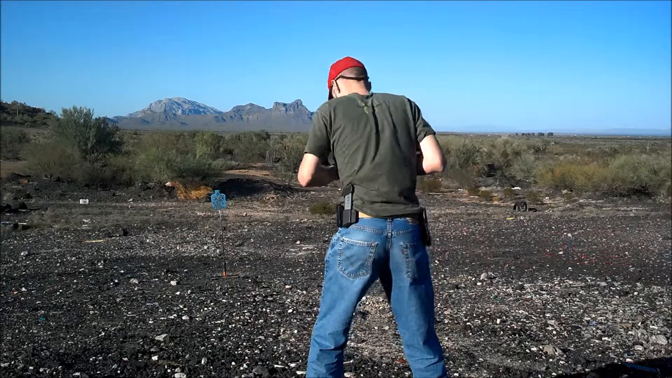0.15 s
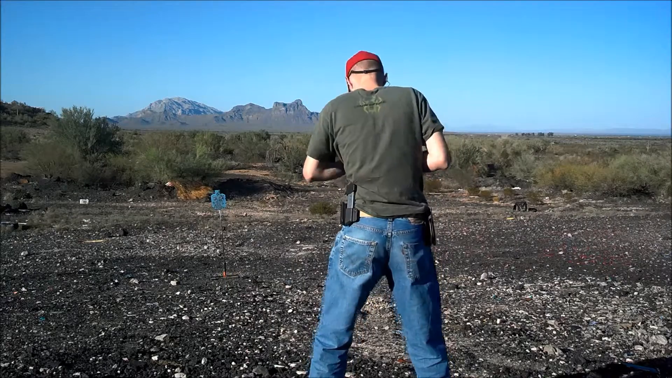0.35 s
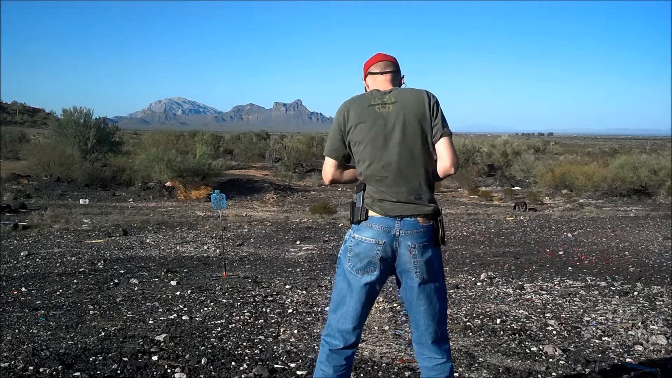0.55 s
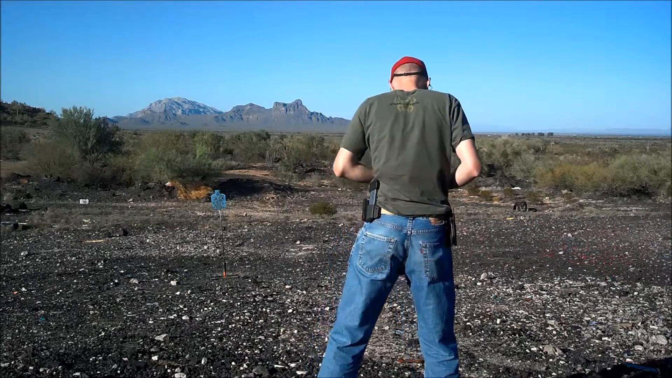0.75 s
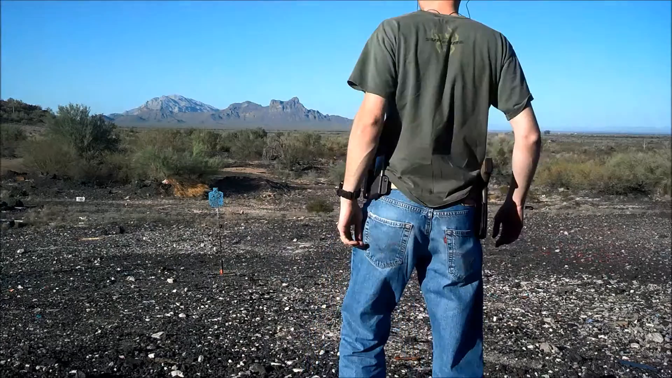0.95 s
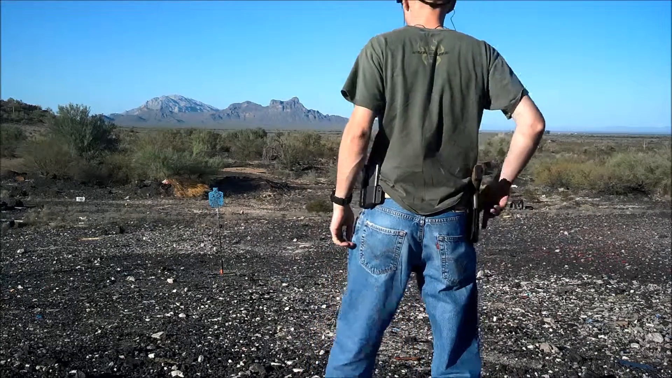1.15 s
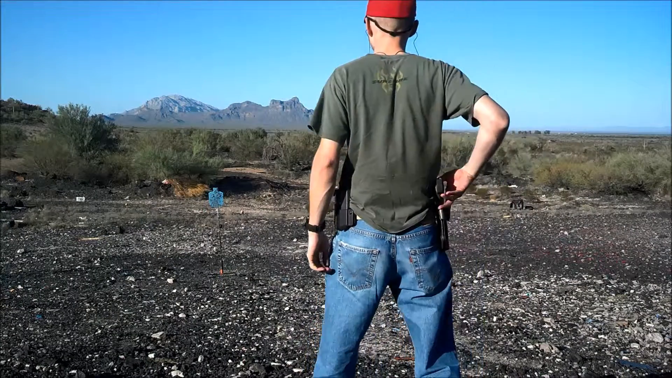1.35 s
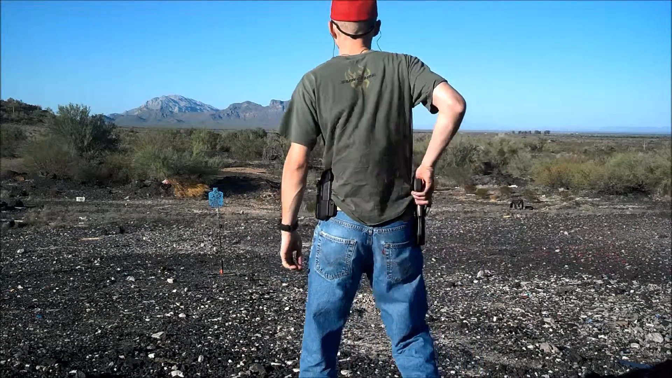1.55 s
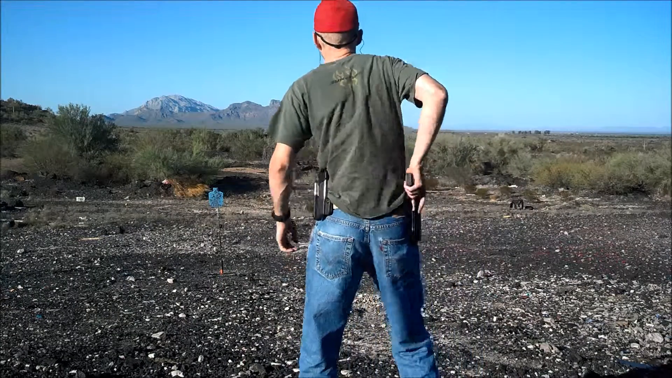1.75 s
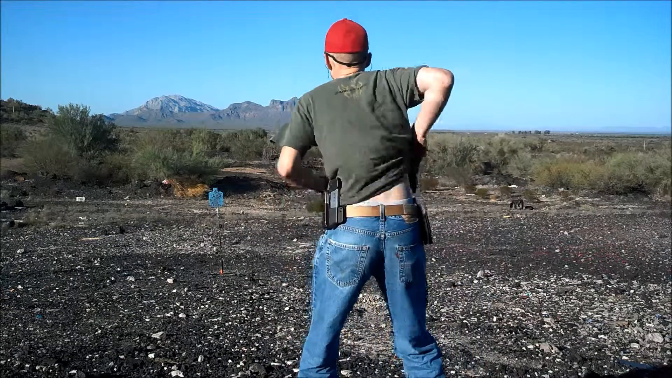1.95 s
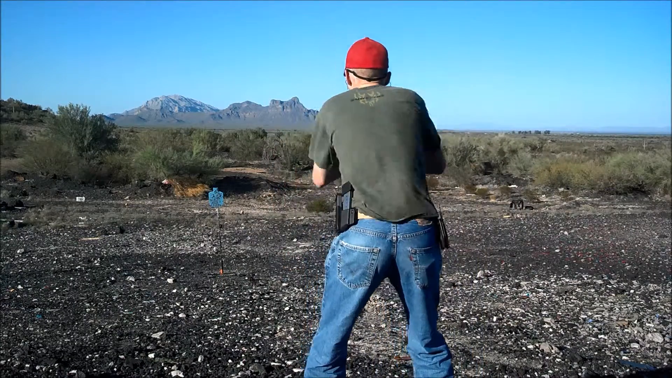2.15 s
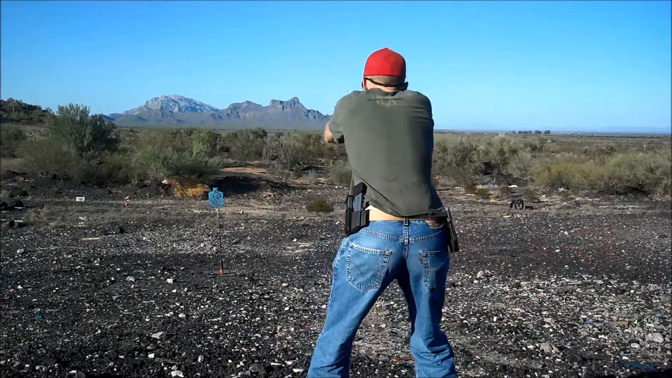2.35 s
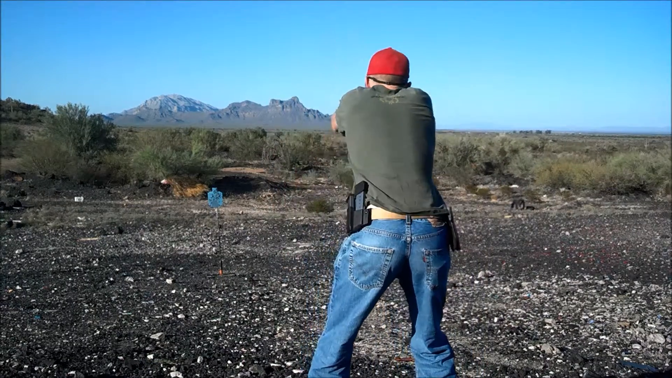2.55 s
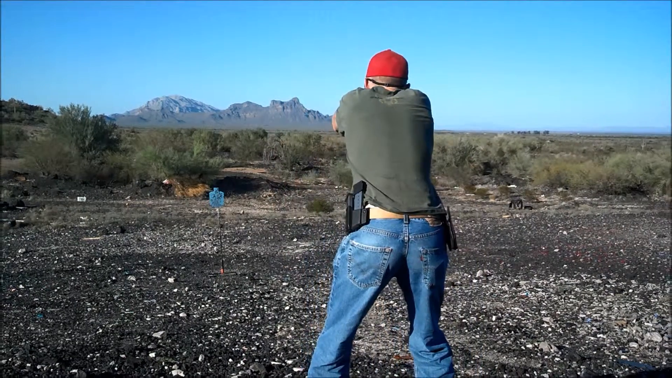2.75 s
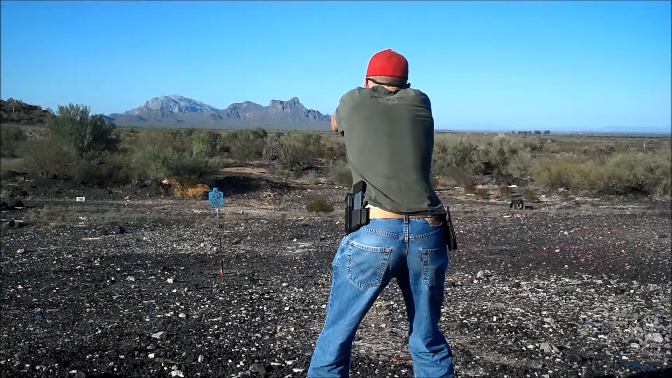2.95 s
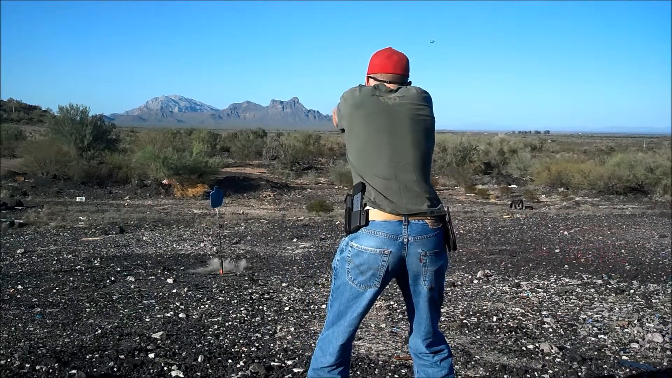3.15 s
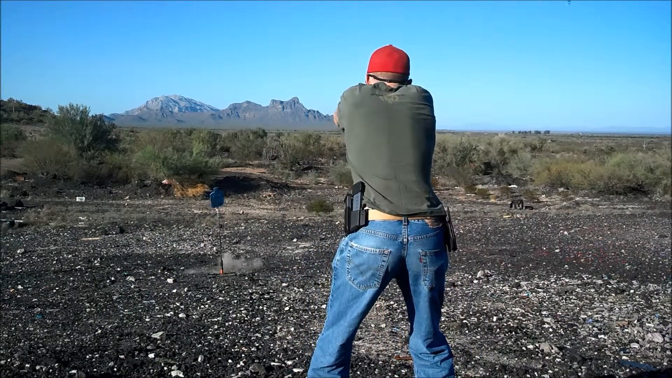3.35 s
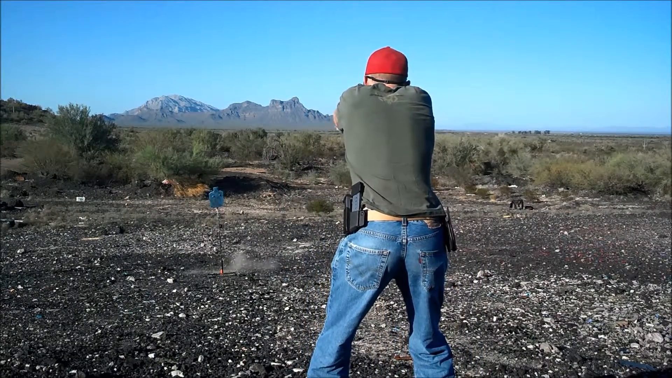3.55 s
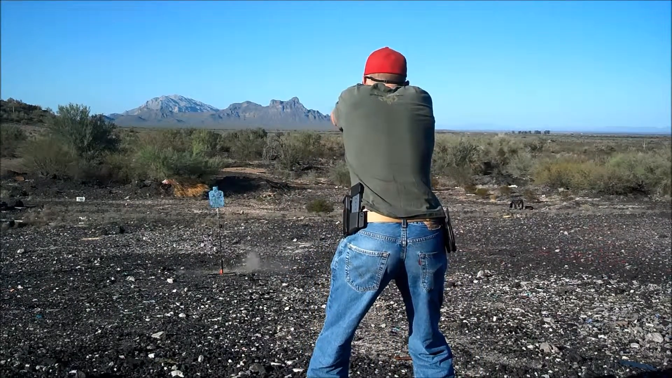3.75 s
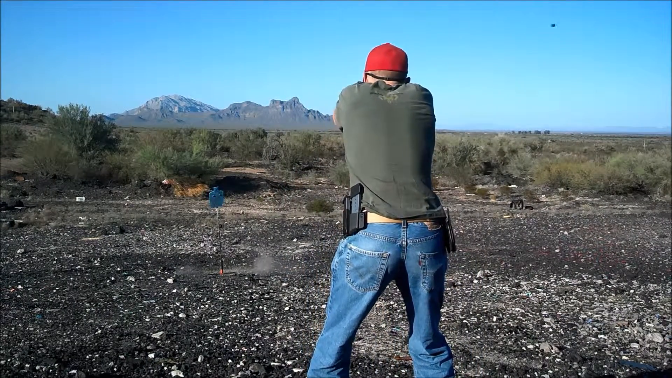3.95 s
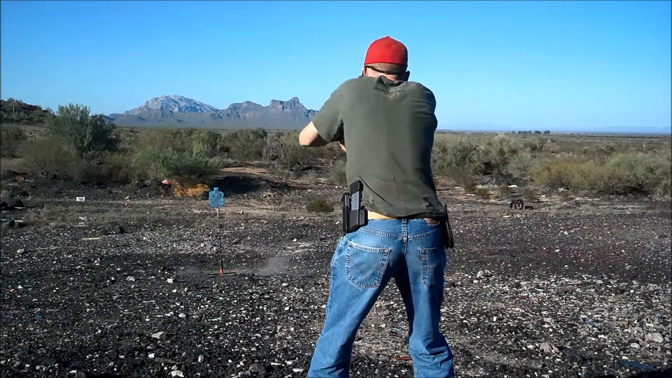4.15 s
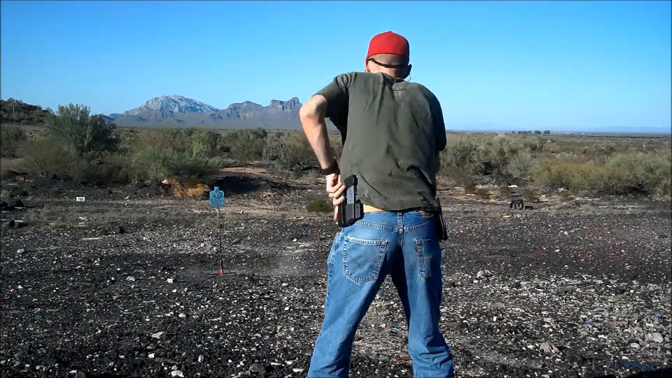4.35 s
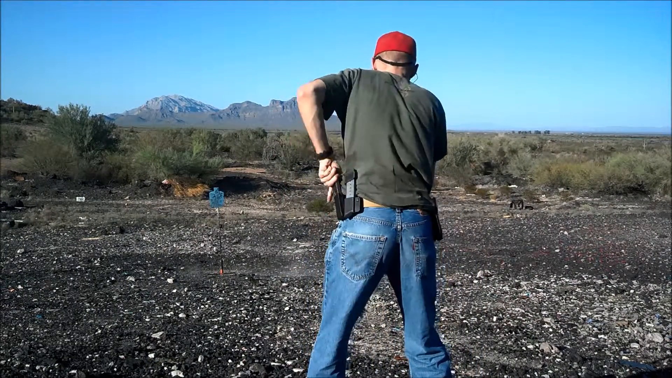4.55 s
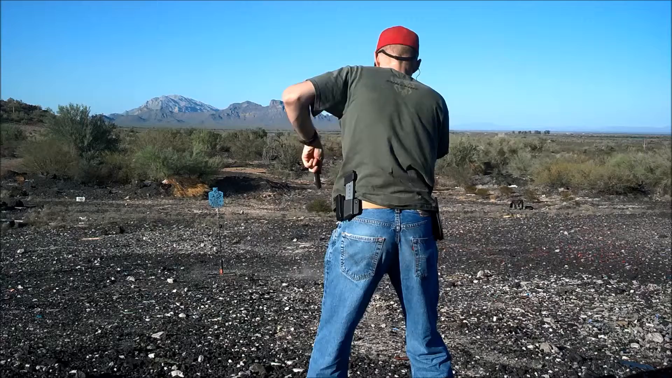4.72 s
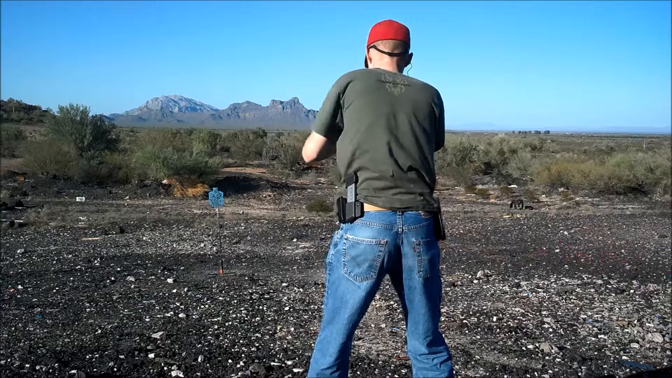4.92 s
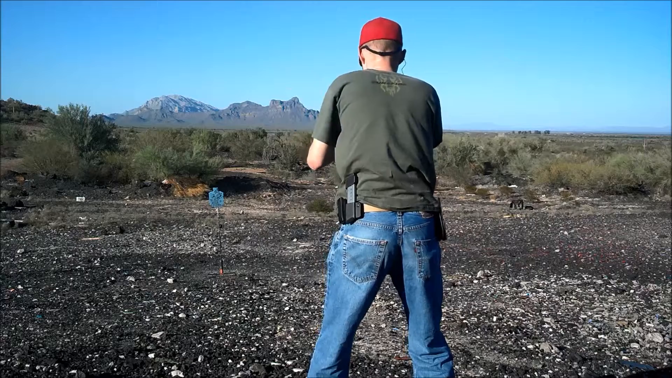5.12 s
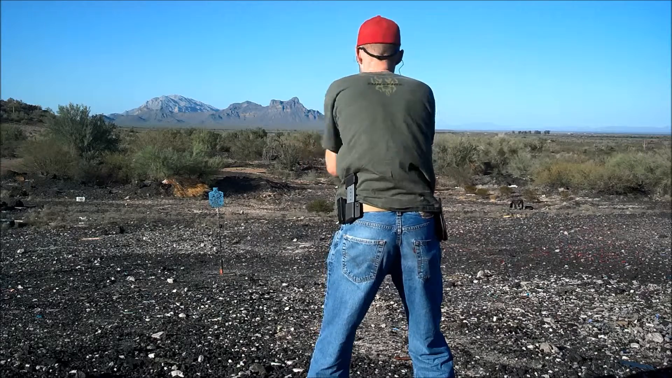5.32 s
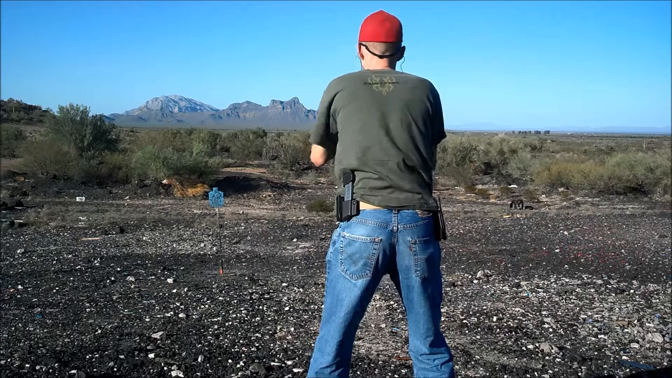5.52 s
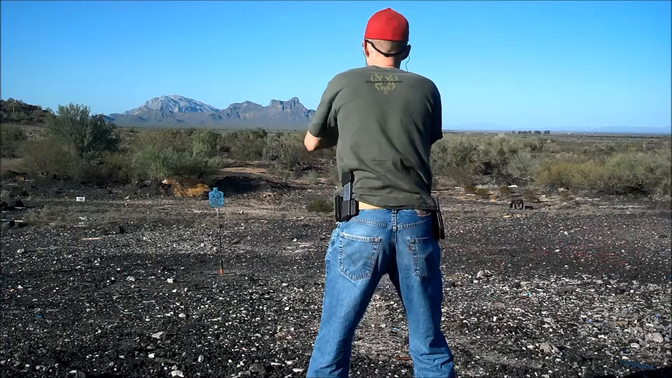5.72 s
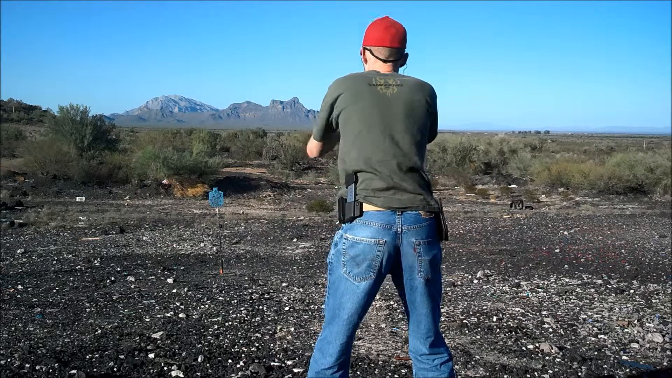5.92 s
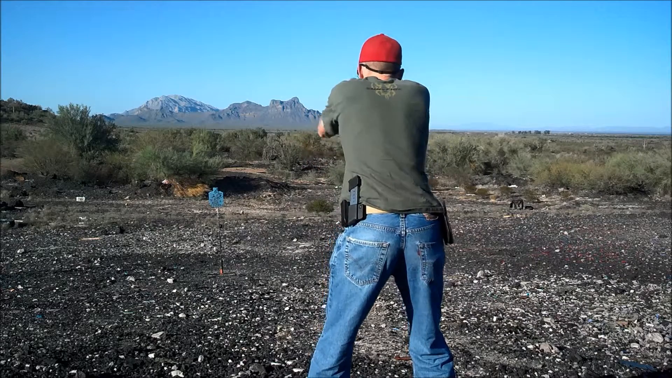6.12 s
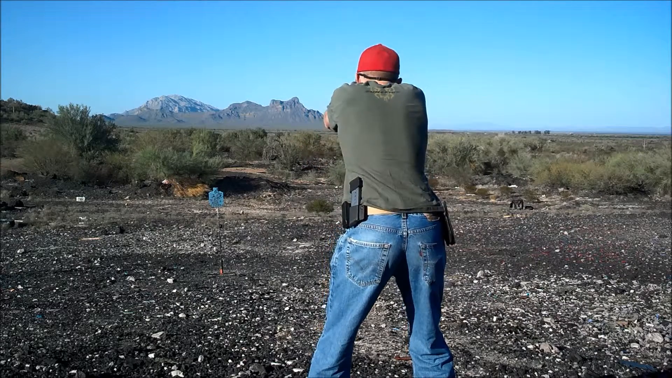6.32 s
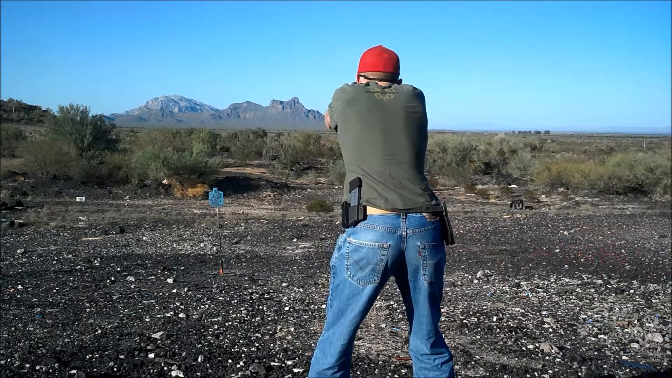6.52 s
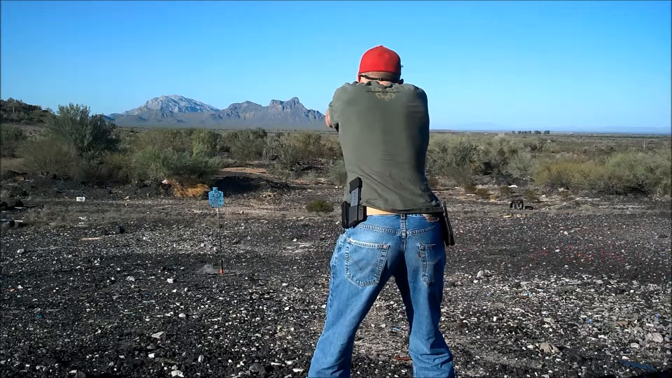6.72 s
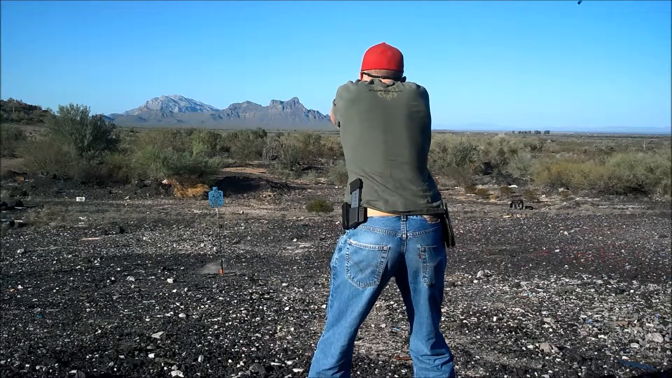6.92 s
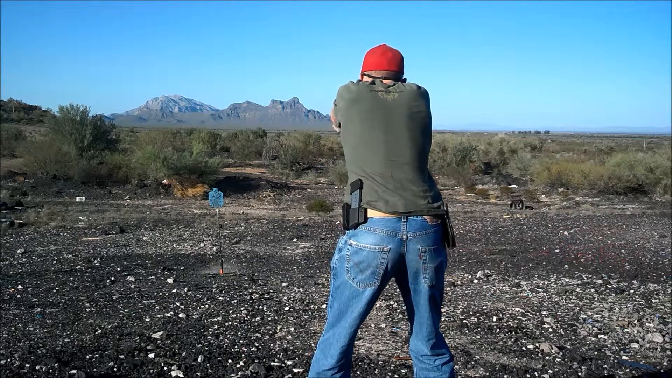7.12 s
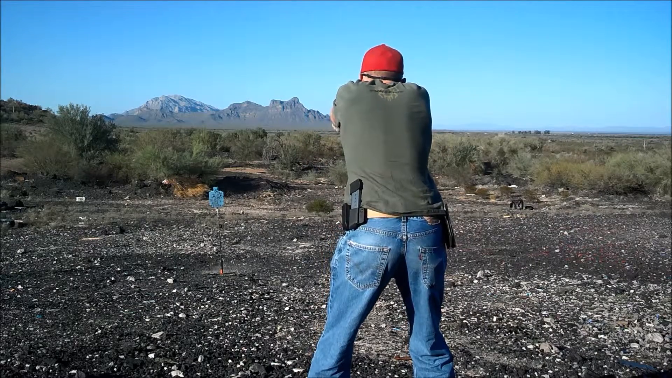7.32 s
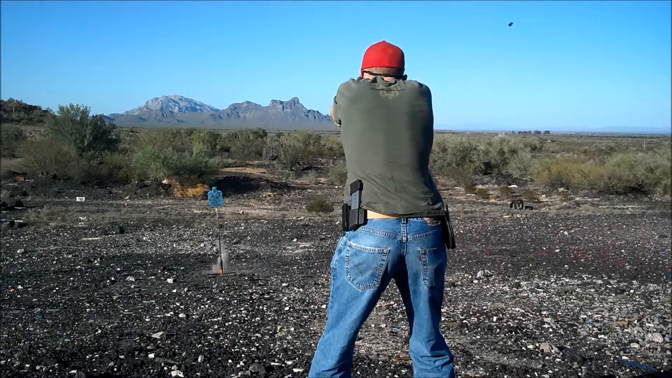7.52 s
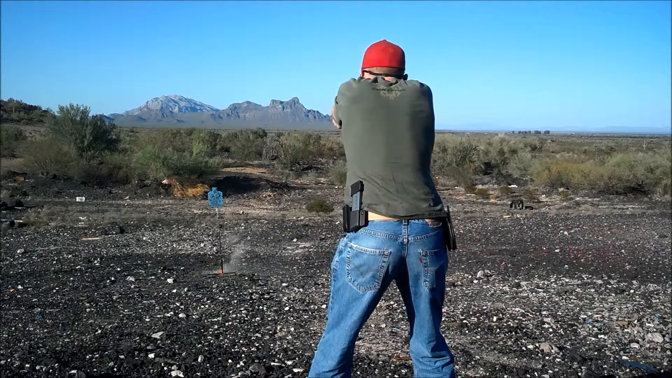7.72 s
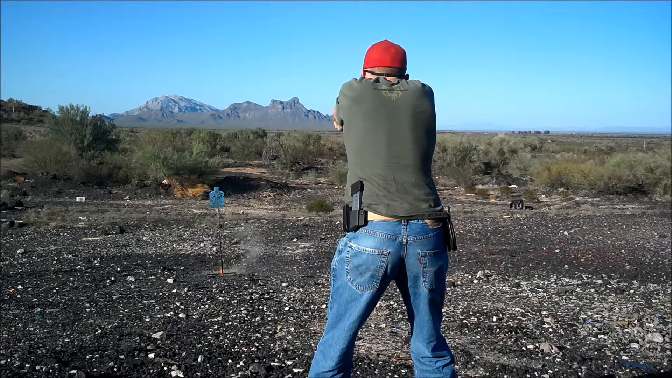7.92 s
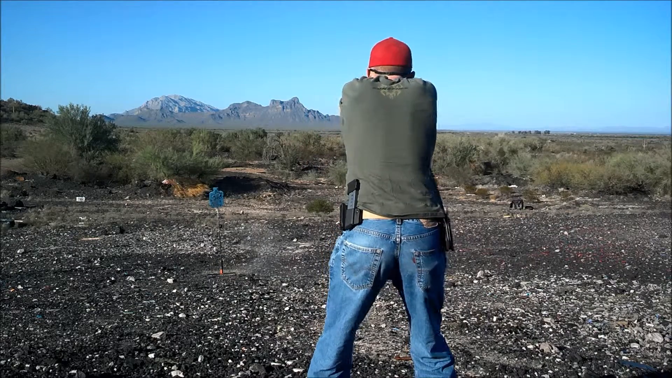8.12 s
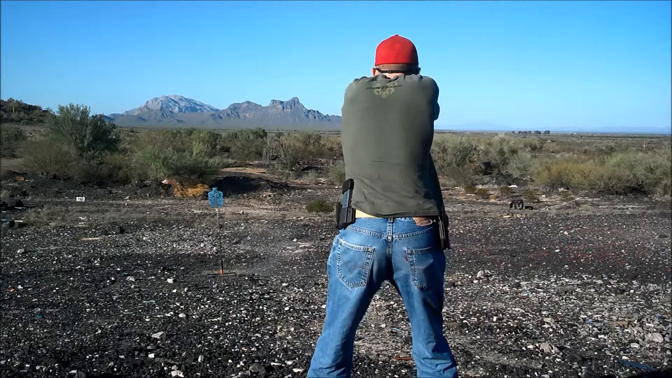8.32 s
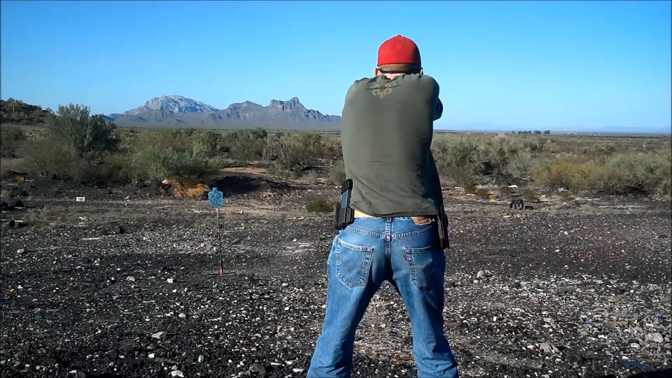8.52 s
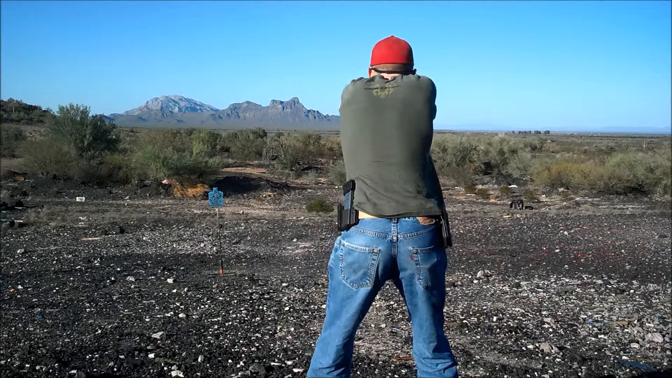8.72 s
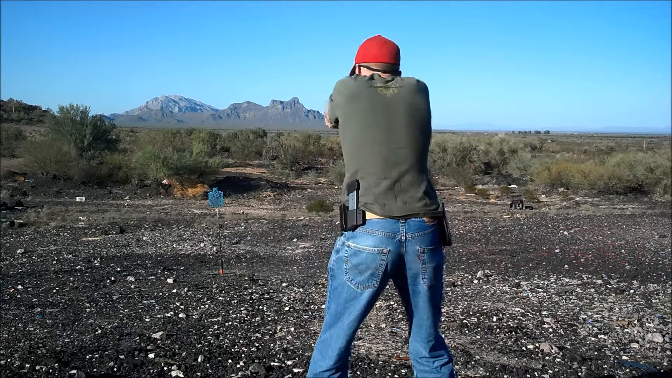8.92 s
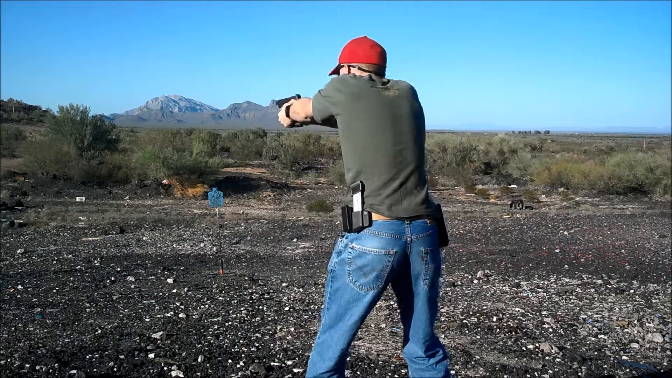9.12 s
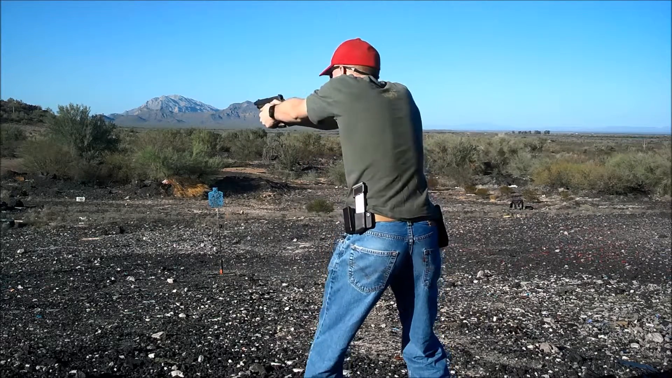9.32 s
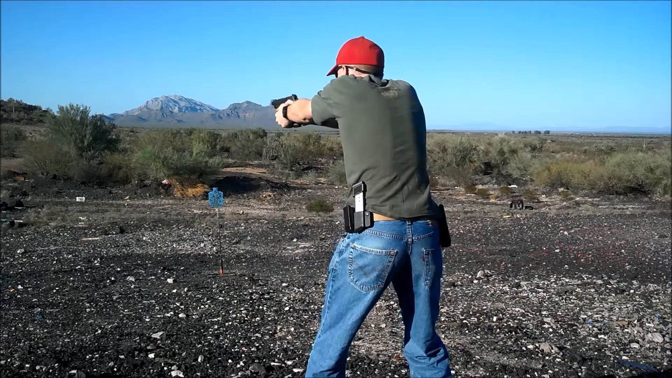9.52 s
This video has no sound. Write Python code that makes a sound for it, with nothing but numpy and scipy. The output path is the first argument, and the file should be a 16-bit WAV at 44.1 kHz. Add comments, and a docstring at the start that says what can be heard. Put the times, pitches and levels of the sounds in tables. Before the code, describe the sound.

A close camera microphone at a dry outdoor range picks up metallic clicks and brisk shirt rustling, then a pair of hard pistol cracks answered by a small steel target and quick terrain echoes. Metal clicks and a slide snap mark the reload, with high thin tinkles from spent brass. A second pair of shots follows, with clearer clangs, before quiet hiss, light tinkling and a breeze moaning on the left.

```python
"""Open air, hiss and a faint far drone come first; then a pistol is drawn, holster and slide clacking, shirt rustling.
It fires two pairs at a desert range, with a magazine change between them; breeze gusts moan on the left.
Each blast is noise scattered off gravel under a sharp pulse; a steel plate rings in modes, and banks and brush echo.
Spent cases tinkle as close pairs of high modes. The camera ducks the background at loud sounds, widens the
stereo by subtracting each side from the other, and overloads softly."""
import sys
import numpy as np
from scipy import signal
from scipy.fft import rfft, irfft, next_fast_len
from scipy.io import wavfile
from scipy.ndimage import uniform_filter1d

SR = 44100
rng = np.random.default_rng(int(sys.argv[2]) if len(sys.argv) > 2 else 0)


def to_wav(sig):
    """Store sig (one row per channel, or 1-D mono) as 16-bit WAV at the path in sys.argv[1].

    Samples outside -1..1 are clipped; the rate is SR.
    """
    pcm = np.clip(np.atleast_2d(sig), -1, 1) * 32767
    pcm = np.round(pcm).astype(np.int16)
    wavfile.write(sys.argv[1], SR, pcm.T)  # frames by channels


N = 426447

# All levels are relative, ahead of the trims in the functions and of the camera's widening.
# Spectra are relative too: colour() scales the noise to rms 1.

# Open air: pitch_hz, level_db
AIR_SPECTRUM = [(20, -23), (60, -15), (130, 2.5), (270, -1), (500, -3), (1000, -7), (2000, -14),
                (4000, -18), (9000, -38.5)]
# Microphone hiss: pitch_hz, level_db
HISS_SPECTRUM = [(500, -6.5), (2000, 0), (4200, -0.5), (5800, -5), (6600, 2.5), (9000, -1.5), (12000, 2.5),
                 (14500, 5), (16000, -1.5)]
# Distant drone: pitch_hz, level_db
DRONE_SPECTRUM = [(40, -17.5), (120, -6.5), (176, 2), (260, -6), (500, -22), (1500, -48.5)]
# Course of the distant drone: time_s, level_db
DRONE_LEVEL = [(0, -58), (.7, -57), (1.5, -72), (6.6, -69.5), (9.67, -52)]
# Moan of the breeze: pitch_hz, level_db
MOAN_SPECTRUM = [(60, -32.5), (200, -24), (340, -13), (470, -4.5), (600, 0.5), (700, 4), (820, -3.5),
                 (1000, -15), (1500, -28), (5000, -49)]
# Gusts of the breeze: peak_s, half_length_s, level_db
GUSTS = [(5.58, 0.22, -50.5), (6.25, .27, -50), (9.21, 0.29, -49.5), (9.7, 0.11, -48)]
LULL_DB = -77  # the breeze between gusts
AIR_DB, HISS_DB = -58, -58.5  # before ducking

# Clacks of holster, magazine and slide: start_s, level_db (800-2500 Hz), brightness_db, strongest_resonance_hz
CLACKS = [(0.216, -46.5, -14, 1145), (.403, -45.5, 3, 1400), (.413, -31, -0.5, 1330),
          (.442, -31.5, 4, 1770), (0.532, -40.5, 3, 7460), (.922, -54, 5.5, 8550), (.959, -43, 6, 7690),
          (0.975, -36, 1.5, 7500), (1.038, -44.5, 8.5, 7000), (1.194, -46, -1, 7300),
          (1.368, -40.5, -12, 388), (1.763, -48.5, 7, 7000), (1.835, -33.5, -10.5, 1990),
          (1.855, -35, 0, 6900), (1.947, -25, -6.5, 1240), (4.448, -46, -7, 1130), (4.567, -40.5, -5, 1750),
          (4.662, -42, -3, 1660), (4.831, -37.5, 6, 3540), (4.854, -45.5, 17.5, 6820),
          (4.961, -60.5, 4, 2700), (5.007, -53.5, 1.5, 2830), (5.046, -47.5, -1, 2200),
          (5.177, -55, 9, 3100), (5.342, -51, 6, 2950), (5.356, -34.5, 5, 3140), (5.741, -43.5, -1.5, 1300),
          (5.78, -31.5, 0.5, 6540), (5.826, -31, 6.5, 3970), (8.248, -41, -11.5, 853),
          (8.414, -57.5, -8, 3330), (8.674, -58, -15, 953)]
# Edges of the four bands of a clack: edge_hz
CLACK_EDGES_HZ = [210, 800, 2500, 5500, 16500]
# Resonances of the pistol's frame and slide: pitch_hz, width_hz, level_db
FRAME = [(375, 460, -19), (1120, 1700, 12.5), (2100, 670, 9), (2660, 570, 6.5), (3900, 510, 7),
         (4980, 1100, 6.5), (7040, 430, 14.5), (8400, 720, 10)]
CLACK_T60_S, THUD_DB = 0.084, -6
TOP_SLOPE = 1.19  # dB gained by the top band for each dB of brightness
# Each part strikes again, lighter and brighter
REBOUND_S, REBOUND_DB, REBOUND_BRIGHT_DB, REBOUND_THUD_DB = .009, -11.5, 4, -10.5
PART_RING_DB, PART_RING_T60_S = -18, 0.21  # the struck part rings on at its strongest resonance
# Fainter steel overtones, drawn afresh for each contact
PARTIAL_DB, PARTIAL_LOW_HZ, PARTIAL_HIGH_HZ = -22, 1540, 7800
# The fresh magazine scrapes and ticks its way into the grip
FEED_START_S, FEED_END_S, FEED_SCRAPE_DB = 4.96, 5.34, -58
FEED_TICK_DB, FEED_BRIGHT_DB, FEED_HZ = -58.5, 1, 2800

# Strokes of arm and hand over shirt, holster and slide: peak_s, length_s, swish_db, scratch_db
STROKES = [(0.963, 0.044, -36, -36.5), (1.018, 0.031, -29, -32), (1.104, .07, -46.5, -37),
           (1.155, 0.055, -43, -54), (1.211, 0.039, -62, -35), (1.236, 0.03, -40, -43),
           (1.364, 0.09, -51, -39.5), (1.43, 0.14, -29, -36.5), (1.505, 0.062, -34, -36.5),
           (1.624, 0.023, -40, -49), (1.676, 0.072, -44.5, -42), (1.877, 0.036, -31, -25),
           (1.937, 0.031, -31.5, -33), (2.03, 0.13, -48, -46), (2.161, 0.075, -47.5, -56),
           (2.242, 0.025, -39, -50), (2.37, 0.014, -62, -46.5), (5.774, .03, -52, -36),
           (5.825, .025, -48, -27.5), (5.97, .08, -72, -58)]
# Low swish of cloth: pitch_hz, level_db
SWISH_SPECTRUM = [(25, -57), (70, -22), (170, -15.5), (300, 2.5), (400, 1), (470, -18), (560, 1.5),
                  (800, -13.5), (1080, -5), (1700, -10.5), (2600, -21.5), (5000, -44)]
# Dry scratch of cloth: pitch_hz, level_db
SCRATCH_SPECTRUM = [(800, -7), (2500, -6.5), (4400, -3), (5800, -5), (7200, 5.5), (9000, -7),
                    (12000, -18.5), (16000, -24)]
STROKE_RISE_DB, STROKE_FALL_DB = 20.5, 17  # change over one length before and after the peak

# Shots: start_s, blast_db, muzzle_crack_db, clang_db, off_centre (0-1, where the plate is hit)
SHOTS = [(3.0987, -17, -5.5, -22.5, 0.46), (3.7565, -16, -10, -28, 0.96), (6.7252, -16.5, -4.5, -19.5, 0.1),
         (7.4133, -16, -13, -16.5, 0.17)]
# Blast scattered by the gravel: pitch_hz, level_db
BLAST_SPECTRUM = [(30, -12.5), (90, -4.5), (200, 4), (420, 6), (900, 5.5), (1500, 0), (2200, 2), (3100, -3),
                  (4300, -4.5), (5800, -10.5), (7100, -3), (9500, -10.5), (16000, -13)]
# Dying of the blast: pitch_hz, t60_s
BLAST_T60 = [(60, 0.1), (250, 0.32), (700, 0.27), (2000, 0.15), (5000, 0.16), (15000, 0.1)]
# Modes of the steel plate: pitch_hz, centre_hit_db, edge_hit_db, t60_s
PLATE = [(1660, -25.5, -8.5, .14), (1920, -21.5, 0.5, 0.15), (2160, -16.5, -5.5, 0.086),
         (3230, -16, -4.5, 0.072), (3640, -20.5, -4, 0.05), (3620, -13, -11.5, 0.1),
         (4490, -18.5, -10, 0.091), (5030, 0, -13.5, .09), (6330, -20, -10.5, 0.1), (6970, -11, -5.5, 0.12),
         (8753, -26, -17, .09), (9500, -24.5, -19, 0.15), (10300, -19, -26.5, 0.063),
         (11600, -19.5, -17, .06)]
# Splash of the bullet on the plate: pitch_hz, level_db
SPLASH_SPECTRUM = [(500, -22.5), (2000, 0), (4000, 1.0), (8000, 1.0), (16000, -14.0)]
CLANG_DELAY_S = 0.058  # bullet out, sound back
SMEAR_T60_S = .06  # scatter that drives the plate's ring
# Returns from the terrain: pitch_hz, level_db
ECHO_SPECTRUM = [(40, -29.5), (110, -12.5), (200, 2.5), (330, 3.5), (650, -4.5), (1200, -3.5),
                 (1750, -11.5), (2200, -7.5), (3600, -9.5), (5700, -17.5), (7300, -16), (10000, -29),
                 (16000, -42)]
# Banks and belts of brush that answer a shot: delay_s, spread_s, level_db, bass_db (relative to level_db)
BANKS = [(.14, .009, -37, 2), (.17, .011, -35.5, -1.5), (.205, 0.014, -38.5, 2.5),
         (0.251, 0.0132, -47, 6.5), (.376, .013, -54, 13.5), (.398, 0.0075, -50, -5.5),
         (0.47, 0.0087, -50, -4.5), (.533, .016, -48, -2), (0.603, 0.0035, -47, -15.5),
         (.632, 0.0077, -51, -11.5)]
ECHO_TREBLE_DB, TREBLE_LOSS_DB_PER_S = 5.5, 26  # the air dulls the later echoes
FAR_DB, FAR_FADE_DB_PER_S, FAR_BASS_DB = -55, 2.5, -6.5  # the open desert's wash behind them

# Brass cases landing and bouncing: start_s, pitch_hz, ring_db, t60_s, stone_tick_db, left_over_right_db
CASES = [(4.064, 10860, -42.5, .26, -52, 10), (4.318, 10930, -39.5, .17, -52.5, -2),
         (4.672, 10990, -32, 0.24, -52, 6.5), (5.161, 10970, -48, .45, -44, -2),
         (5.315, 11000, -36, 0.2, -61, -9), (5.441, 10970, -52.5, 0.53, -67, 0),
         (7.706, 10940, -45.5, 0.26, -52, 0), (7.983, 10900, -66, 0.22, -72, -1),
         (8.366, 11000, -45.5, 0.24, -49, -2), (8.604, 11900, -56, 0.16, -73.5, 0.5),
         (9.105, 11000, -43, 0.31, -41, 3), (9.4, 11100, -45.5, 0.29, -52, -2)]
# Tick of a case on a stone: pitch_hz, level_db
TICK_SPECTRUM = [(800, -26), (3000, -2), (3850, 12.5), (4700, 3.5), (11000, -1.5), (16000, -4.5)]

# Share of each channel the camera subtracts from the other: pitch_hz, share (capped at 0.95)
CROSSFEED = [(100, 0.49), (500, 0.099), (1200, 1), (2450, 0.8), (3600, 0.76), (5000, 0.27), (7000, 0.14),
             (12000, 0.095)]
CROSSFEED_S = .000408  # delay of the subtracted copy
EDGE_HZ = 15950  # top of the recorded band


def amp(db):
    """Decibels to gain."""
    return 10 ** (np.asarray(db) / 20)


def unit(x):
    """Scales to rms 1."""
    return x / np.sqrt(np.mean(x ** 2) + 1e-20)


def read(points, hz):
    """Reads a table along log frequency."""
    f, value = np.transpose(points)
    return np.interp(np.log(hz + 1), np.log(f + 1), value)


def add(mix, s, sound):
    """Mixes a stereo sound in at time s."""
    part = mix[:, max(round(s * SR), 0):][:, :sound.shape[1]]
    part += sound[:, :part.shape[1]]


def colour(x, spectrum):
    """Gives x a spectrum, at rms 1."""
    size = next_fast_len(x.shape[1])
    gain = amp(read(spectrum, np.fft.rfftfreq(size, 1 / SR)))
    return unit(irfft(rfft(x, size) * gain, size)[:, :x.shape[1]])


def noise(spectrum, size=N):
    """Coloured noise, unrelated on the two sides."""
    return colour(rng.standard_normal((2, size)), spectrum)


def scatter(t, hold, t60):
    """Envelope of a scattered sound: level for a moment, then dying."""
    return amp(-60 * np.maximum(t - hold, 0) / t60)


def convolve_short(x, response):
    """Convolves along time and keeps the length of x."""
    return signal.oaconvolve(x, response, axes=1)[:, :x.shape[1]]


def ripple(size, depth_db, width_hz):
    """Chance peaks and dips across the spectrum, as many small resonances and reflections give."""
    hz = np.fft.rfftfreq(size, 1 / SR)
    knots_db = depth_db * rng.standard_normal(SR // 20)
    return amp(np.interp(hz / width_hz, np.arange(SR // 20), knots_db))


def outdoors(lean_db=9):
    """Steady air and hiss, a far drone that comes and goes, and gusts moaning on the left of the camera."""
    t = np.arange(N) / SR
    breeze = amp(LULL_DB) + sum(amp(db) * np.exp(-((t - s) / half) ** 2) for s, half, db in GUSTS)
    moan = breeze * noise(MOAN_SPECTRUM) * amp([[2], [2.5 - lean_db]])
    drone = amp(np.interp(t, *np.transpose(DRONE_LEVEL))) * noise(DRONE_SPECTRUM)
    background = amp(AIR_DB) * noise(AIR_SPECTRUM) + amp(HISS_DB) * noise(HISS_SPECTRUM) + drone
    return background, moan


def overtones(t, bright_db, count=6):
    """A few narrow steel modes; the high ones follow the brightness of the blow."""
    height, phase = rng.random((count, 1, 1)), rng.random((count, 2, 1))
    hz = PARTIAL_LOW_HZ * (PARTIAL_HIGH_HZ / PARTIAL_LOW_HZ) ** height
    modes = amp(PARTIAL_DB + bright_db * height) * np.sin(2 * np.pi * (hz * t + phase))
    return modes.sum(0)


def contact(level_db, thud_db, bright_db, main_hz, snap_db=5, snap_s=0.00065, hold=0.0047,
            rise_s=0.00049, main_width_hz=220):
    """Two parts knock: a snap and a short rattle through the frame's resonances, each contact ringing its own way."""
    t = np.arange(8192) / SR
    hz = np.fft.rfftfreq(len(t), 1 / SR)
    body = 1 + sum((amp(db) - 1) / (1 + (2 * (hz - f) / width) ** 2) for f, width, db in FRAME)
    main_peak = 1 + 2.5 / (1 + (2 * (hz - main_hz) / main_width_hz) ** 2)
    body = body * ripple(len(t), depth_db=3.5, width_hz=110) * main_peak

    # Each band is levelled on its own, then they are joined by power
    bands_db = (thud_db, 0, bright_db, TOP_SLOPE * bright_db)
    power = 0
    for low, high, band_db in zip(CLACK_EDGES_HZ, CLACK_EDGES_HZ[1:], bands_db):
        band = body / np.sqrt((1 + (low / (hz + 1)) ** 12) * (1 + (hz / high) ** 12))
        power = power + (amp(level_db + band_db) * unit(band)) ** 2

    rattle = irfft(rfft(rng.standard_normal((2, len(t)))) * np.sqrt(power))
    rattle = rattle * scatter(t, hold, CLACK_T60_S) * amp(snap_db * np.exp(-t / snap_s))
    main = amp(PART_RING_DB) * np.sin(2 * np.pi * (main_hz * t + rng.random((2, 1))))
    ring = amp(level_db) * (main + overtones(t, bright_db)) * scatter(t, 0, PART_RING_T60_S)
    return (rattle + ring) * np.minimum(t / rise_s, 1)


def handling(level_db=-1, pan_db=1.47, rebound_spread=.25, tick_spread_db=5, count=18):
    """Every clack of the pistol rebounds once; the magazine ticks unevenly as it slides in."""
    out = np.zeros((2, N))
    for (s, db, bright_db, main_hz), late in zip(CLACKS, rng.uniform(-0.89, 1, len(CLACKS))):
        add(out, s, contact(db, THUD_DB, bright_db, main_hz))
        rebound = contact(db + REBOUND_DB, REBOUND_THUD_DB, bright_db + REBOUND_BRIGHT_DB, main_hz)
        add(out, s + REBOUND_S * (1 + rebound_spread * late), rebound)
    tick_times = rng.uniform(FEED_START_S, FEED_END_S, count)
    for s, (force, bright) in zip(tick_times, rng.uniform(-0.6, 1, (count, 2))):
        tick_db = FEED_TICK_DB + tick_spread_db * force
        tick_bright_db = FEED_BRIGHT_DB + tick_spread_db * bright
        add(out, s, contact(tick_db, REBOUND_THUD_DB, tick_bright_db, FEED_HZ))
    return out * amp(level_db) * amp([[pan_db], [-pan_db]])


def rubbing():
    """Strength of swish and scratch: each stroke swells and dies away, and the magazine scrapes evenly."""
    t = np.arange(0, N, 64) / SR  # coarse steps, interpolated below
    swish, scratch = 0, amp(FEED_SCRAPE_DB) * ((t > FEED_START_S) & (t < FEED_END_S))
    for s, length, swish_db, scratch_db in STROKES:
        u = (t - s) / length
        shape_db = np.maximum(np.minimum(STROKE_RISE_DB * u, -STROKE_FALL_DB * u), -200)
        swish = np.hypot(swish, amp(swish_db + shape_db))
        scratch = np.hypot(scratch, amp(scratch_db + shape_db))
    return [np.interp(np.arange(N) / SR, t, gain) for gain in (swish, scratch)]


def clothes(swish_db=-2, scratch_db=-3, grain_db=3.0, crackle_db=-2, snags_per_s=220, snag_t60=0.016):
    """Cloth slips in small catches: a low swish, a dry scratch and tiny snags, each fold with its own colour."""
    swish, scratch = rubbing()
    catches = unit(amp(grain_db * unit(uniform_filter1d(rng.standard_normal(N), size=260))))

    snags = (rng.random(N) < snags_per_s / SR) * amp(4.5 * np.minimum(rng.exponential(1, N), 4))
    t = np.arange(SR // 20) / SR
    snag = rng.standard_normal((2, len(t))) * scatter(t, 0, snag_t60)
    crackle = colour(signal.oaconvolve(snags[None], snag, axes=1)[:, :N], SCRATCH_SPECTRUM)

    rasp = unit(noise(SCRATCH_SPECTRUM) + amp(crackle_db) * crackle)
    rub = amp(swish_db) * swish * noise(SWISH_SPECTRUM) + amp(scratch_db) * scratch * rasp
    z = signal.stft(rub, nperseg=1024)[2]
    folds = uniform_filter1d(rng.standard_normal(z.shape[1:]), size=3, axis=0)
    folds = unit(uniform_filter1d(folds, size=6, axis=1))
    rub = signal.istft(z * unit(amp(3.5 * folds)), nperseg=1024)[1][:, :N]
    return catches * rub * amp([[1], [-1]])


def crack(t, ring_hz=2500, ring_t60=0.0043, push_s=0.0001, edge_db=-9):
    """The muzzle's pressure pulse, with a hard edge, sets the microphone ports ringing against each other."""
    push = (1 - t / push_s) * np.exp(-t / push_s)
    ring = np.sin(2 * np.pi * ring_hz * t) * scatter(t, .001, ring_t60)
    edge = rng.standard_normal((2, len(t))) * scatter(t, 0.0017, ring_t60)
    return push + ring * np.array([[1], [-1]]) + amp(edge_db) * edge


def blast(gravel, level_db, crack_db, hold=0.026, body_rise=0.004, ground_s=.0068, ground=0.2,
          change=0.69, ripple_db=2.5):
    """A sharp crack, then a dense spray of gravel reflections whose bass builds and dies more slowly."""
    size = gravel.shape[1]
    spray = gravel + change * noise(BLAST_SPECTRUM, size=size)  # the muzzle moves a little from shot to shot
    bounce = 1 + ground * np.exp(-2j * np.pi * np.fft.rfftfreq(size, 1 / SR) * ground_s)
    spray = unit(irfft(rfft(spray) * bounce * ripple(size, depth_db=ripple_db, width_hz=110), size))
    hz, t, z = signal.stft(spray, SR, nperseg=256)
    hz = hz[:, None]
    build = 1 - np.exp(-(t + 0.006) / body_rise) / (1 + (hz / 1500) ** 2)
    decay = scatter(t, hold, read(BLAST_T60, hz))
    spray = signal.istft(z * build * decay, SR, nperseg=256)[1][:, :size]
    t = np.arange(size) / SR
    return (amp(level_db + 5.5) * spray + amp(crack_db) * crack(t)) * np.minimum(t / .0003, 1)


def clang(level_db, off_centre, hold=.013, splash_db=-4, splash_t60=0.13, ring_db=-13):
    """The bullet splashes on the plate and rings the modes that suit the spot it hits; gravel smears the ring."""
    t = np.arange(SR // 3) / SR
    share = np.clip(off_centre, 0, 1)
    strike = 1 + 3 * np.exp(-t / 0.00038)
    drive = rng.standard_normal((2, len(t))) * scatter(t, hold, SMEAR_T60_S) * strike
    ring = 0
    for hz, centre_db, edge_db, t60 in PLATE:
        mode = np.sin(2 * np.pi * hz * t) * scatter(t, 0, t60)
        mode_db = centre_db + share * (edge_db - centre_db)
        ring = ring + amp(mode_db) * unit(convolve_short(drive, mode[None]))
    splash = noise(SPLASH_SPECTRUM, size=len(t)) * scatter(t, hold, splash_t60)
    splash = amp(splash_db - 21.5) * splash * np.minimum(t / .0006, 1)
    return amp(level_db + ring_db) * ring + splash


def echoes(wash_from_s=.2, flutter_db=1.0, patchy_db=2.0):
    """Each bank returns a smeared copy of a shot; the farther it is, the more treble the air takes."""
    hz, t, z = signal.stft(noise(ECHO_SPECTRUM, size=SR * 5 // 4), SR, nperseg=256)
    hz = hz[:, None]
    bass, treble = 1 / (1 + (hz / 480) ** 4), 1 / (1 + (2600 / (hz + 1)) ** 4)
    bank_power = 0
    for delay, spread, db, bass_db in BANKS:
        smear = np.exp(-.5 * ((t - delay) / spread) ** 2)
        bank_power = bank_power + amp(db + bass_db * bass) ** 2 * smear
    wash = amp(FAR_DB - FAR_FADE_DB_PER_S * t + FAR_BASS_DB * bass)
    wash = wash * np.minimum(t / wash_from_s, 1) * scatter(t, .9, 1.0)
    air_db = treble * (ECHO_TREBLE_DB - TREBLE_LOSS_DB_PER_S * np.minimum(t, .65))

    # Single bushes and rocks, each with its own colour
    patches = uniform_filter1d(rng.standard_normal(z.shape), size=3, axis=0)
    patches = unit(uniform_filter1d(patches, size=7, axis=1))
    rocks_db = flutter_db * rng.standard_normal(len(t)) + patchy_db * patches
    gain = np.sqrt(bank_power + wash ** 2) * amp(air_db + rocks_db)
    return signal.istft(z * gain, SR, nperseg=256)[1]


def gunfire():
    """Every shot stirs the same gravel, the same target and the same terrain."""
    out = np.zeros((2, N))
    terrain, gravel = echoes(), noise(BLAST_SPECTRUM, size=SR // 2)
    for s, blast_db, crack_db, clang_db, off_centre in SHOTS:
        add(out, s, blast(gravel, blast_db, crack_db) * amp([[.5], [-.5]]))
        add(out, s + CLANG_DELAY_S, clang(clang_db, off_centre))
        add(out, s, terrain * amp([[1.2], [-1.2]]))
    return out


def cases(level_db=-3, tick_t60=0.062, split_hz=45, twin=0.55, smear_db=-9, smear_t60=0.065):
    """A brass case ticks on a stone and rings with a close pair of high modes; the gravel smears the ring."""
    out, t = np.zeros((2, N)), np.arange(SR // 2) / SR
    for s, hz, ring_db, t60, tick_db, pan_db in CASES:
        phase = 2 * np.pi * rng.random((2, 2, 1))
        ring = np.sin(2 * np.pi * hz * t + phase[0])
        ring = ring + twin * np.sin(2 * np.pi * (hz + split_hz) * t + phase[1])
        ring = ring * scatter(t, 0, t60) * np.minimum(t / 0.00044, 1)
        stones = rng.standard_normal((2, len(t))) * scatter(t, 0, smear_t60)
        ring = ring + amp(smear_db) * ring.std() * unit(convolve_short(ring, stones))
        tick = noise(TICK_SPECTRUM, size=len(t)) * scatter(t, 0, tick_t60)
        sound = amp(ring_db) * ring + amp(tick_db) * tick
        add(out, s, sound * amp(level_db) * amp([[pan_db / 2], [-pan_db / 2]]))
    return out


def ducking(x, threshold_db=-37, share=0.84, recover_db_per_s=6.5):
    """Gain that drops at once when x is loud and creeps back."""
    power = abs(uniform_filter1d((x ** 2).mean(0), size=700))
    power_db = 10 * np.log10(power + 1e-12)
    recovered = recover_db_per_s * np.arange(N) / SR
    cut_db = share * np.maximum(power_db - threshold_db, 0)
    return amp(recovered - np.maximum.accumulate(cut_db + recovered))


def widen(x):
    """Each side has a delayed copy of the other subtracted, which combs the middle and the sides in turn."""
    size = next_fast_len(N + 512)
    z, hz = rfft(x, size), np.fft.rfftfreq(size, 1 / SR)
    share = np.clip(read(CROSSFEED, hz), 0, .95)
    other_side = share * np.exp(-2j * np.pi * hz * CROSSFEED_S) * z[::-1]
    return irfft((z - other_side) / np.sqrt(1 + share ** 2), size)[:, :N]


def scene():
    """The camera's stereo pair: near sounds push the background down; the moan is neither ducked nor widened."""
    background, moan = outdoors()
    near = handling() + clothes() + gunfire() + cases()
    return widen(near + ducking(near) * background) + moan


def record(dry, ceiling=1.4):
    """Soft overload of the loudest peaks, then the band limit."""
    loud = ceiling * np.tanh(dry / ceiling)
    low_pass = signal.firwin(511, EDGE_HZ, window=("kaiser", 9), fs=SR)
    return signal.oaconvolve(loud, low_pass[None], "same")


dry = scene()
out = record(dry)
to_wav(out)
```